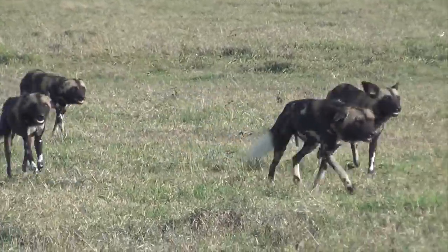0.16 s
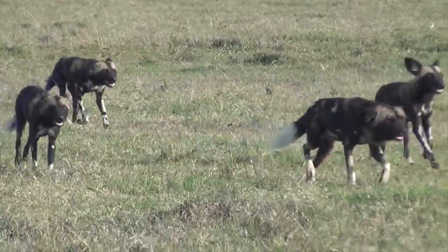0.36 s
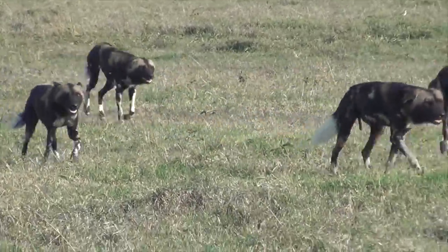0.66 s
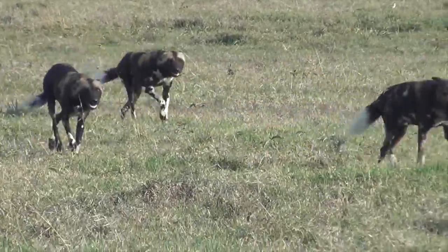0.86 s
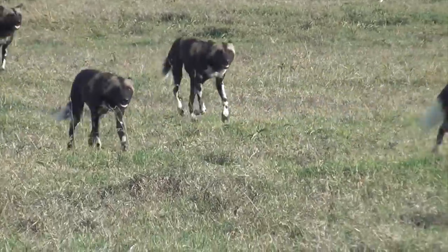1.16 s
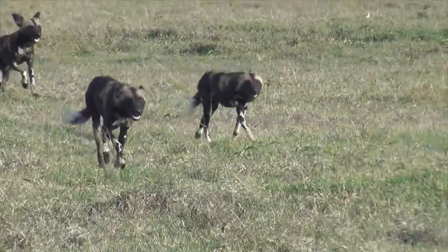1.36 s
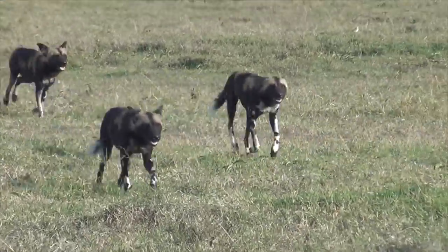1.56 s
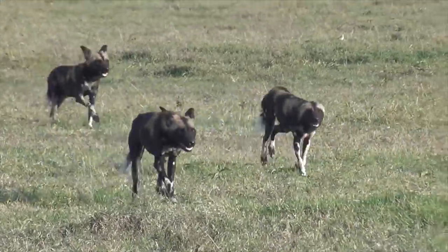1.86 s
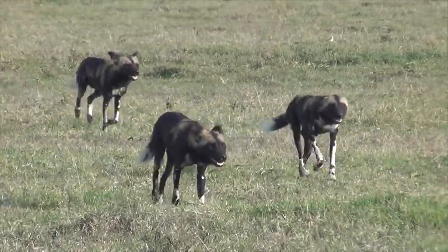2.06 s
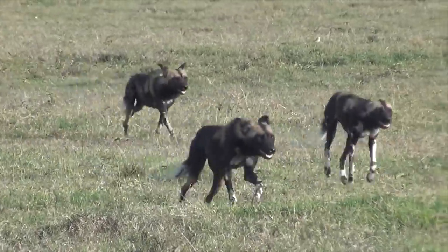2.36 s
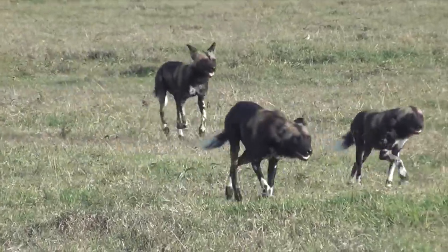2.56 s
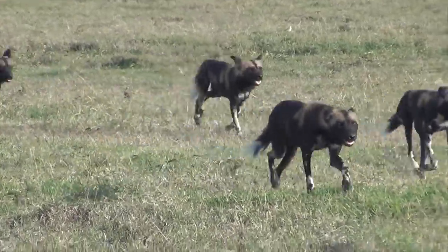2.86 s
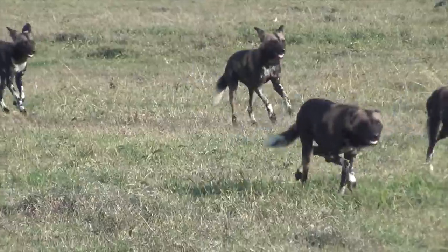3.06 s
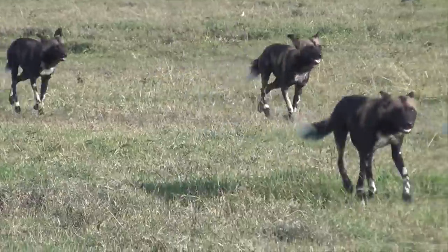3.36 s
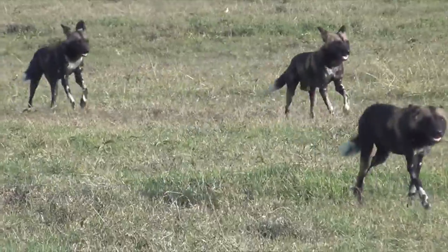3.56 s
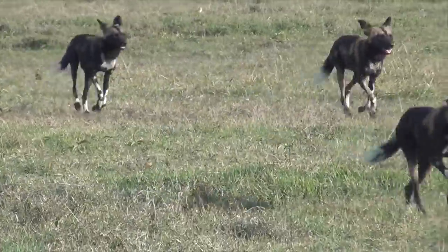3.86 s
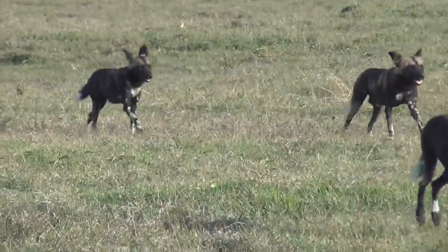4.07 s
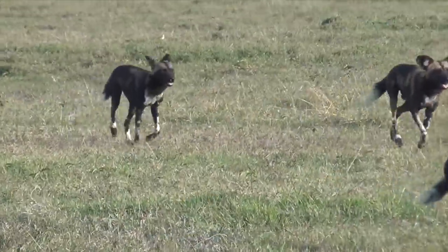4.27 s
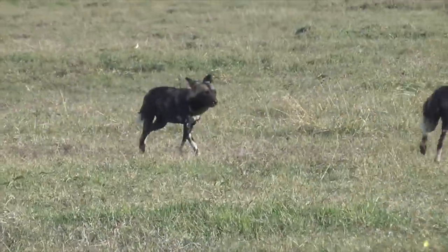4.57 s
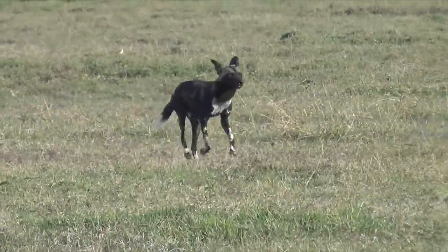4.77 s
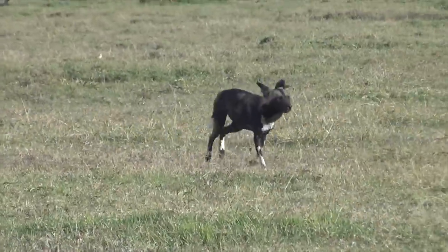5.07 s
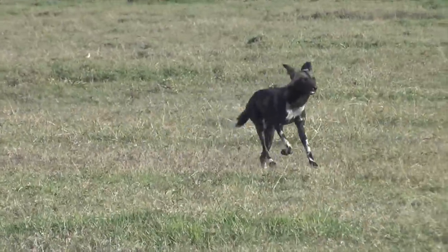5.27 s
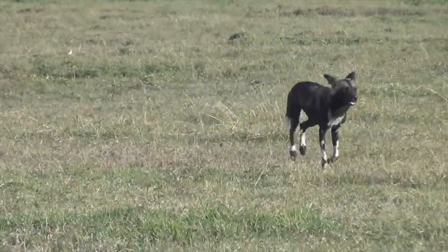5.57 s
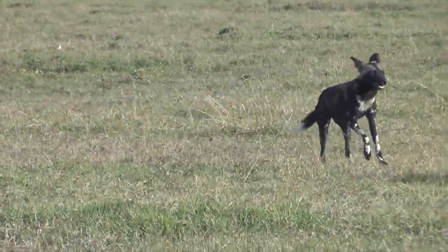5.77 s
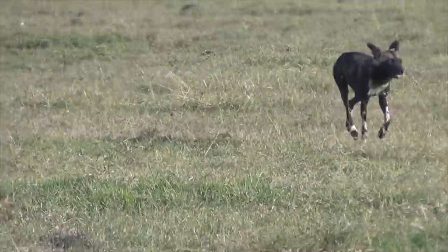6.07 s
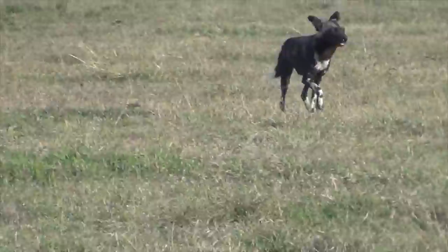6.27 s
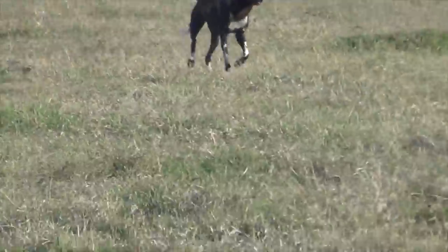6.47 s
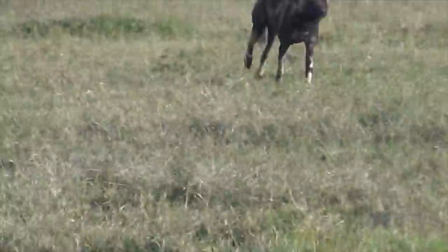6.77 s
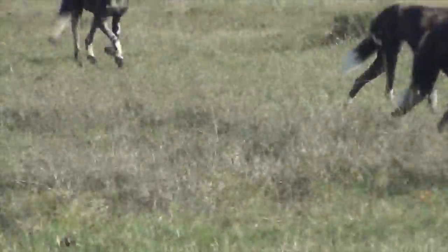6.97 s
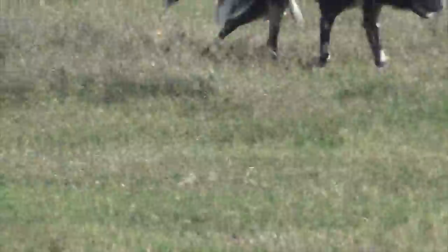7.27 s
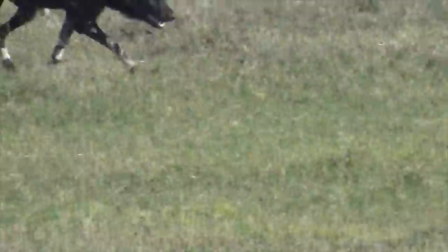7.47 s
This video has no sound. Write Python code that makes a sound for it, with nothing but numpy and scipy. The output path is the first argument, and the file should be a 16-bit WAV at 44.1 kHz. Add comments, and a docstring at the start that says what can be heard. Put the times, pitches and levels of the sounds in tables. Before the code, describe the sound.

A pack of wild dogs twitters in rapid, high, hoarse chirps that thin to single calls, over wind rumbling and thumping on the microphone.

```python
"""On open grassland a pack of wild dogs twitters, the overlapping calls thinning out to single ones.
Each call climbs in a low voice, cracks hoarsely into a higher one, crests and drops away.
Wind rumbles and thumps as swirls of air hit the microphone. Late on comes one faint click,
then a sharper tick close by. A soft hiss and a thin whine lie under it all."""
import sys
import numpy as np
from scipy import signal
from scipy.fft import rfft, irfft
from scipy.io import wavfile
from scipy.ndimage import uniform_filter1d

SR = 44100
rng = np.random.default_rng(int(sys.argv[2]) if len(sys.argv) > 2 else 0)


def master(y):
    """Save y as 16-bit WAV."""
    cut = np.clip(np.atleast_2d(y).T, -1, 1)
    pcm = np.round(cut * 32767)  # scale
    wavfile.write(sys.argv[1], SR, pcm.astype(np.int16))


N = 336483
TIME = np.arange(N) / SR

# Calls that crack from low to high. Each row: start in seconds, rise time in seconds, starting and
# crest pitch of the main overtone in Hz, lead-in level, crest level and brightness in dB, roughness 0-1.
TWITTERS = [(-.04, 0.066, 2744, 2903, -46, -31, -0.5, .15), (0, 0.069, 2250, 2710, -54, -38, -2, 0.37),
            (.135, 0.074, 2060, 2744, -57.5, -37.5, 1, 0.65),
            (.181, 0.065, 2490, 2680, -53, -36.5, -4, 0.16), (.199, 0.074, 2610, 2830, -60, -33.5, 3, .23),
            (.23, .14, 2380, 2580, -49.5, -38.5, -20, 0.25),
            (.548, 0.049, 2230, 2740, -45.5, -32.5, -1, 0.19), (.57, 0.076, 2206, 2740, -48, -50, -1, 0.19),
            (0.694, 0.079, 2230, 2895, -49.5, -41, 0, 0.3), (.7, .085, 2130, 2755, -58, -38.5, 3, 0.07),
            (.81, 0.12, 2216, 2870, -47.5, -41, -15, 0.22), (.82, .169, 1955, 2797, -51.5, -42.5, 9, 0.21),
            (.93, 0.068, 2436, 2820, -59, -37, -5, 0.22), (1.06, 0.15, 2255, 2710, -49, -39, 4, 0.57),
            (1.099, 0.14, 1940, 2950, -49, -39, -1.5, 0.1), (1.323, .106, 1920, 2750, -52, -32.5, -5, 0.5),
            (1.38, 0.1, 2280, 2810, -58, -33, -5.5, 0.3),
            (1.671, 0.12, 2000, 2840, -43.5, -32.5, -9.5, 0.12),
            (1.692, 0.12, 1850, 2890, -46.5, -48, -1, 0.37),
            (1.835, 0.068, 2084, 2677, -51, -35.5, -10, 0.12),
            (1.936, 0.12, 2150, 2830, -49, -37.5, -8, 0.37), (1.945, 0.2, 1960, 2697, -47.5, -39, -3, 0.3),
            (2.215, 0.17, 1890, 2850, -56, -36.5, -13, 0.06),
            (2.262, .14, 2223, 2716, -49, -50.5, 4.5, 0.42), (2.4, .068, 2500, 2750, -62, -50.5, 0, 0.13),
            (2.53, 0.16, 1900, 3090, -55, -39.5, -18, 0.6),
            (2.588, 0.087, 2300, 2595, -56, -43.5, 0.5, 0.62),
            (2.845, 0.12, 2113, 2937, -49.5, -48.5, -5, 0.4),
            (2.869, 0.073, 2330, 2680, -58, -41.5, -4, 0.34),
            (3.151, 0.12, 2105, 2830, -47.5, -46, -1.5, 0.48),
            (3.468, 0.13, 2060, 2836, -49, -42.5, -1.5, 0.36), (3.792, 0.11, 2080, 2814, -49, -45, 1.5, .2),
            (4.112, 0.11, 2097, 2770, -47.5, -45, -1, 0.17), (4.421, 0.11, 2087, 2797, -44, -45, 1, 0.37),
            (4.71, 0.13, 2013, 2884, -53, -44.5, -0.5, 0.3), (4.94, 0.16, 1894, 2564, -54, -36.5, -9, 0.55),
            (5.031, 0.089, 2210, 2740, -50.5, -35, -5.5, 0.38),
            (5.273, 0.11, 1920, 2820, -46, -35.5, 0, 0.28),
            (5.264, 0.17, 1883, 2975, -55, -47.5, -15, 0.76), (5.542, .097, 1946, 2740, -51, -43, -2, 0.16),
            (5.79, .102, 2036, 2920, -48, -42.5, 2, 0.32), (6.045, 0.1, 2080, 2800, -53, -46, 5.5, 0.2),
            (6.309, .098, 2100, 2850, -48, -47, -4, .25), (6.547, .102, 1984, 2860, -55, -47, 4.5, 0.22),
            (6.776, .103, 1970, 2930, -58, -46, 3.5, 0.32),
            (7.028, 0.1, 1957, 2895, -41.5, -39, -0.5, 0.29), (7.265, .092, 2060, 2995, -52, -43, -9, 0.31),
            (7.475, 0.09, 1887, 2950, -52, -46, 2.5, .4)]
# Calls that flutter in the high voice. Each row: the same as a twitter, without the roughness.
TRILLS = [(.32, .1, 2505, 2696, -54, -33, -5), (0.449, 0.081, 2660, 2840, -59.5, -38.5, 7),
          (1.58, 0.08, 2200, 2690, -54.5, -37.5, -5), (2.709, 0.14, 2470, 2860, -64, -45, -20),
          (2.999, 0.071, 2395, 2750, -60, -49.5, -2), (3.08, .13, 2430, 2716, -57, -42.5, -1),
          (3.298, 0.14, 2170, 2660, -58, -51, 0), (3.631, .14, 2507, 2814, -57, -41, -1.5),
          (3.954, .14, 2050, 2210, -60.5, -46, -5), (4.295, .155, 2140, 2346, -52, -38.5, -9),
          (5.599, 0.14, 2130, 2744, -55.5, -40.5, -6.5), (5.913, 0.14, 2170, 2686, -57.5, -40, -8),
          (6.202, 0.1, 1950, 2514, -57, -52, -10)]
def dog_pack(left_db=-1.4, spread_db=3, max_lag_s=.00004):
    """The dogs call from different directions, so left and right differ a little in time and level."""
    wobbles = voice_wobbles()
    calls = []
    for start, rise_s, *settings in TWITTERS:
        crack_s = max(rise_s - .053, .0178)  # shortly before the crest, never right at the start
        call = dog_call(wobbles, rise_s, *settings, crack_s=crack_s, climb=.57, flutter=.12)
        calls.append((start, call))
    for start, *settings in TRILLS:
        call = dog_call(wobbles, *settings, rough=.34, crack_s=.0162, climb=.166, flutter=.617)
        calls.append((start, call))
    out = np.zeros((2, N))
    for (start, call), direction in zip(calls, rng.uniform(-1, 1, len(calls))):
        t = np.arange(len(call)) / SR
        pan_db = left_db + spread_db * direction
        lag = max_lag_s * direction / 2
        left = gain_of(pan_db) * np.interp(t - lag, t, call)
        right = gain_of(-pan_db) * np.interp(t + lag, t, call)
        add(out, start, np.array([left, right]))
    return out


def dog_call(wobbles, rise_s, start_hz, crest_hz, lead_db, crest_db, bright_db, rough,
             crack_s, climb, flutter, fall_s=.02367, flutter_hz=88):
    """One call: the voice glides up, turns hoarse as it cracks from low to high, then drops away."""
    end_s = rise_s + fall_s
    t = np.arange(0, end_s, 1 / SR)
    drift, shake, shimmer, rasp = np.roll(wobbles, -rng.integers(N), 1)[:, :len(t)]
    falling = np.clip((t - rise_s) / fall_s, 0, 1)
    push = np.exp(-(np.minimum(t - rise_s, 0) / .02336) ** 2)  # the last effort: higher, louder, steadier
    cracking = np.exp(-((t - crack_s - .008) / .02) ** 2) * np.clip(t / .036, 0, 1)
    hoarse = np.clip(rough + .25 * flutter, 0, 1) * (1 - .7 * falling)
    hoarse *= .45 + 1.15 * cracking + .3 * (t > crack_s)
    # An uneven trill shakes both loudness and pitch.
    trill_depth = np.clip(flutter + .5 * rough, 0, 1) * (1 - .8 * push) * np.clip(t / .03, 0, 1)
    trill_phase = 2 * np.pi * np.cumsum(flutter_hz * (1 + .42 * drift)) / SR

    crack_hz = start_hz + climb * (crest_hz - start_hz)  # climb is the share of the rise made by then
    hz = np.interp(t, [0, crack_s, rise_s], [start_hz, crack_hz, crest_hz * (1 - .0344)])
    hz *= 1 + .0344 * push
    hz *= 1 - .215 * (1 + .28 * drift[-1]) * falling ** 2.12  # each call drops by its own amount
    waver = (.012 + .025 * trill_depth ** 2) * drift[::-1] + .0632 * hoarse * shake
    waver += .082 * trill_depth ** 2 * np.cos(trill_phase + 1.2)
    cycles = np.cumsum(hz * (1 + waver)) / SR

    # The main overtone glides on while the note beneath it leaps up by a fifth.
    treble_db = bright_db * (.5 + .5 * push) - 4 * (1 - push) * (1 + trill_depth ** 2)
    low = throat_tone(hz, cycles, harmonic=3, bass_db=2.5, treble_db=treble_db - 7.5)
    high = throat_tone(hz, cycles, harmonic=2, bass_db=0, treble_db=treble_db - .9)
    high_share = .5 + .5 * np.tanh((t - crack_s) / .0023)
    voice = np.sqrt(1 - high_share) * low + np.sqrt(high_share) * high
    voice = voice * (1 + hoarse * shimmer) + .83 * hoarse * rasp * (1 - .5 * push)

    effort_db = np.interp(t, [0, crack_s, rise_s, end_s],
                          [lead_db - 1, lead_db, crest_db - 1.5, crest_db - 7.5])
    effort_db += push - 16 * flutter * falling  # fluttering calls die away faster
    fades = np.clip(t / .0053, 0, 1) * np.clip((end_s - t) / .0045, 0, 1)
    return voice * (1 + .64 * trill_depth * np.cos(trill_phase)) * fades * gain_of(effort_db)


# How a dog's throat and mouth colour its voice. Each row: frequency in Hz, boost or cut in dB.
THROAT = [(700, -12), (1350, -11.5), (1700, 3), (2150, 7.5), (2700, 1.5), (3300, 4.5), (4150, -6.5),
          (4700, -0.5), (5500, -13.5), (6200, -22), (7100, -12), (8500, -27.5), (11000, -61)]
def throat_tone(hz, cycles, harmonic, bass_db, treble_db):
    """A stack of overtones shaped by the throat; the main one, at hz, is number `harmonic`."""
    ratio = np.arange(1, 4 * harmonic + 1)[:, None] / harmonic
    db = curve_at(THROAT, ratio * hz) - curve_at(THROAT, hz)
    db += bass_db * (ratio < 1) + treble_db * (ratio > np.sqrt(2))
    db -= 5 * ((ratio > 1) & (ratio < np.sqrt(2)))  # softens the low voice's fourth harmonic
    return np.sqrt(2) * (gain_of(db) * np.cos(2 * np.pi * ratio * cycles)).sum(0)


# The hoarse noise in the voice. Each row: frequency in Hz, relative level in dB.
RASP = [(600, -35), (1300, -60), (1800, 19.5), (2500, 29), (3300, 18), (4100, -22), (4700, 12),
        (5400, -3.5), (6200, -50), (10000, -45)]
def voice_wobbles():
    """What makes a voice unsteady: random drift, faster shake and shimmer, and a noisy rasp."""
    return np.array([wander(80), wander(330), wander(600), noise(RASP, HISS_LIKENESS).mean(0)])


def grassland_echo(sound, die_away_s=.23, echo_db=-17):
    """The ground and tufts of grass scatter the calls into a short, faint tail."""
    t = np.arange(SR // 2) / SR
    tail = rng.standard_normal((2, len(t))) * gain_of(-60 * t / die_away_s) * (t > .002)
    tail /= np.linalg.norm(tail[0])
    return sound + gain_of(echo_db) * signal.fftconvolve(sound, tail, axes=1)[:, :N]


# The breeze between gusts. Each row: time in seconds, rumble strength in dB, swirl strength in dB.
BREEZE = [(0, -32, -30.5), (.28, -34.5, -31.5), (.43, -42.5, -41.5), (.6, -31, -30), (1.75, -44, -28),
          (2.0, -36.5, -29.5), (2.85, -33.5, -31), (3.75, -33, -31), (3.951, -35.5, -40), (4.33, -36, -40),
          (4.46, -33, -32), (5.2, -32, -35.5), (6.0, -30.5, -45.5), (6.12, -40, -57), (6.28, -32, -41.5),
          (6.8, -31, -38), (7.6, -23.5, -34.5)]
# Gusts. Each row: start in seconds, length in seconds, rumble strength in dB, swirl strength in dB.
GUSTS = [(0.166, 0.11, -32, -26), (0.666, 0.16, -26, -23), (0.864, 0.25, -32, -25),
         (1.179, 0.062, -22.5, -28.5), (1.348, 0.13, -34, -24.5), (1.469, 0.22, -25.5, -22),
         (2.26, 0.13, -36, -26), (2.448, 0.21, -22, -22.5), (3.07, 0.26, -29, -26),
         (3.377, 0.29, -32.5, -33), (3.698, 0.041, -24, -29), (4.569, 0.04, -27, -25),
         (4.952, 0.083, -26, -34.5), (5.271, 0.13, -27, -35), (5.614, 0.237, -26.5, -32),
         (5.902, .14, -25.5, -29.5), (6.186, 0.024, -19, -32), (6.391, 0.049, -27, -29.5),
         (6.913, 0.12, -28, -37), (7.066, 0.03, -16.5, -31), (7.155, 0.146, -28, -36),
         (7.329, 0.081, -21, -29), (7.522, 0.11, -18, -22.5)]
def wind_strength(rise_s=.0093, drop_s=.01):
    """Gusts rise, hold and drop on top of the breeze. Gives two curves in dB: rumble and swirls."""
    times, *levels = np.transpose(BREEZE)
    power = gain_of([np.interp(TIME, times, db) for db in levels]) ** 2
    for start, length, *gust_db in GUSTS:
        ramps = np.minimum((TIME - start) / rise_s, (start + length - TIME) / drop_s)
        power += np.outer(gain_of(gust_db), np.clip(.5 + ramps, 0, 1)) ** 2
    return 10 * np.log10(power)


# The tone of deep rumble, small swirls and hard blowing. Each row: frequency in Hz, relative level in dB.
RUMBLE = [(10, -13), (25, -10), (55, -4), (90, -2.5), (125, -6.5), (180, -13), (300, -29), (600, -101.5)]
SWIRLS = [(40, -19), (100, 4.5), (150, 1.5), (210, -2.5), (320, -14), (450, -23.5), (700, -31),
          (1200, -34.5), (3000, -88)]
BLOWING = [(30, -0.5), (120, 8), (280, 6.5), (420, -2), (650, -16.5), (1000, -35.5), (1500, -42.5),
           (2200, -48), (5000, -75)]
# How alike the wind is left and right. Each row: frequency in Hz, likeness from -1 (opposite) to 1 (same).
WIND_LIKENESS = [(30, 0.62), (90, 0.99), (180, 0.58), (350, 0.08), (700, -0.37), (1500, 0.45)]
def wind(rumble_db, swirl_db):
    """Churning air at the microphone: deep rumble, small swirls and a tearing that grows fast in gusts."""
    lumps_db = 2 * wander(40.4)
    rumble = steadied(noise(RUMBLE, WIND_LIKENESS), span_s=.0894)
    rumble *= gain_of(rumble_db + .5 + 2.1 * wander(22.4))
    swirls = steadied(noise(SWIRLS, WIND_LIKENESS), span_s=.0395)
    swirls *= gain_of(swirl_db - 3.5 + lumps_db)
    tearing_db = -31.5 + 1.78 * (swirl_db + 25) + 2 * lumps_db
    return rumble + swirls + noise(BLOWING, WIND_LIKENESS) * gain_of(tearing_db)


# The hardest hits of wind. Each row: start in seconds, strength in dB, strength of its bright edge in dB.
THUMPS = [(0.144, -22.5, -50), (.213, -17, -30), (0.224, -12, -46), (.657, -16, -29), (.698, -16.5, -25.5),
          (0.785, -16.5, -45), (0.959, -11, -21), (1.015, -12.5, -45), (1.349, -22, -42),
          (1.391, -10.5, -27), (1.485, -9.5, -26.5), (1.499, -17, -19.5), (1.541, -21, -44),
          (1.566, -26, -25), (2.226, -22.5, -45), (2.283, -13, -21), (2.44, -13, -25.5),
          (2.477, -11.5, -19), (2.614, -16, -27.5), (3.472, -23, -60), (3.525, -17.5, -62),
          (3.568, -17, -58), (4.595, -15, -31), (4.607, -19, -49), (7.077, -20.5, -44), (7.594, -9, -27)]
def wind_thumps(swirl_db, rise_s=.0034, edge_hz=520):
    """A hard swirl of air shoves the microphone's thin membrane for a few milliseconds."""
    body = steadied(noise(BLOWING, WIND_LIKENESS), span_s=.0079)
    cut_bass = signal.butter(3, edge_hz, "high", fs=SR, output="sos")
    edge = steadied(unit_level(signal.sosfilt(cut_bass, body)), span_s=.0054)
    body_gain, edge_gain = np.zeros((2, N))
    for start, body_db, edge_db in THUMPS + small_thumps(swirl_db):
        near = slice(max(int((start - .01) * SR), 0), int((start + .06) * SR))
        age = np.maximum(TIME[near] - start, 0) / rise_s
        shove = age * np.exp(1 - age)
        body_gain[near] += shove * gain_of(body_db + .5)
        edge_gain[near] += shove * gain_of(edge_db + 2)
    return body * body_gain + edge * edge_gain


def small_thumps(swirl_db, count=48, scatter_db=5):
    """Lesser swirls strike at uneven times, harder in stronger wind. Gives rows like those of THUMPS."""
    offset, size = rng.random((count, 2)).T
    starts = (np.arange(count) + offset) / count * N / SR
    body_db = np.interp(starts, TIME, swirl_db) + 1 + scatter_db * (2 * size - 1)
    return list(zip(starts, body_db, body_db - 20))


# The tick's ringing tones. Each row: frequency in Hz, width in Hz (wider dies sooner), level in dB.
TICK_TONES = [(1260, 320, -9.5), (3390, 110, -11.5), (3870, 200, -11), (4350, 270, -13), (5040, 120, -17),
              (8000, 340, -9), (9900, 1250, 7.5), (10900, 1100, 5.5), (13100, 510, -8)]
def near_tick(start_s=6.716, gain_db=-11, rise_s=.0001, tail_s=.031):
    """A small hard knock beside the microphone: a bright snap and a brief rattling tail."""
    t = np.arange(SR // 12) / SR
    snap = sum(gain_of(db) * ringing(t, hz, width_hz) for hz, width_hz, db in TICK_TONES)
    snap *= 1 - np.exp(-t / rise_s)
    shared, apart = rng.standard_normal((2, len(t)))
    rattle = gain_of(-23 - 60 * t / tail_s) * np.array([shared + apart / 2, shared - apart / 2]) / 3
    rattle[:, 0] = 1  # the snap itself comes first
    lean_left = gain_of([[1.2], [-1.2]])
    out = np.zeros((2, N))
    add(out, start_s, gain_of(gain_db) * lean_left * signal.fftconvolve(rattle, snap[None], axes=1))
    return out


def faint_click(start_s=4.727, gain_db=-40, decay_s=.003):
    """A tiny dry click, high and thin, in the middle."""
    t = np.arange(SR // 30) / SR
    fizz = signal.fftconvolve(rng.standard_normal(len(t)), ringing(t, hz=7000, width_hz=1000))
    click = unit_level(fizz[:len(t)]) * np.exp(-t / decay_s)
    out = np.zeros((2, N))
    add(out, start_s, gain_of(gain_db) * np.array([click, click]))
    return out


# The tone of the hiss. Each row: frequency in Hz, relative level in dB.
HISS = [(290, -4), (500, -5.5), (630, -7.5), (891, -5.5), (1030, -11), (1320, -11.5), (1440, -8),
        (2150, -13.5), (3000, -19), (3470, -16.5), (4370, -17), (5830, -20.5), (15800, -22)]
# How alike the hiss is left and right. Each row: frequency in Hz, likeness (1 is the same).
HISS_LIKENESS = [(500, 0.5), (1500, 0.51), (4000, 0.62), (10000, 0.89)]
def hiss_and_whine(hiss_db=-52.5, whine_db=-72, whine_hz=15734):
    """The even hiss of distant grass and the microphone, with a thin electronic whine."""
    hiss = gain_of(hiss_db + .3 * wander(5.1)) * noise(HISS, HISS_LIKENESS)
    whine = gain_of(whine_db) * np.sqrt(2) * np.sin(2 * np.pi * whine_hz * TIME)
    return hiss + whine


def gain_of(db):
    """Turns decibels into a number to multiply a sound by."""
    return 10 ** (np.asarray(db) / 20)


def unit_level(sound):
    """Scales a sound to an average power of 1."""
    return sound / np.sqrt(np.mean(sound ** 2) + 1e-20)


def curve_at(table, hz):
    """Reads between the rows of a frequency table, giving each octave equal room."""
    row_hz, values = np.transpose(table)
    return np.interp(np.log(hz + 1), np.log(row_hz + 1), values)


def add(mix, start_s, sound):
    """Adds a stereo sound to the mix, dropping whatever sticks out at either end."""
    at = round(start_s * SR)
    sound = sound[:, max(-at, 0):]
    part = mix[:, max(at, 0):][:, :sound.shape[1]]
    part += sound[:, :part.shape[1]]


def ringing(t, hz, width_hz):
    """One struck tone dying away."""
    return np.exp(-np.pi * width_hz * t) * np.sin(2 * np.pi * hz * t)


def wander(rate_hz):
    """A smooth random curve that moves no faster than about rate_hz."""
    hz = np.fft.rfftfreq(N, 1 / SR)
    return unit_level(irfft(rfft(rng.standard_normal(N)) / (1 + (hz / rate_hz) ** 4), N))


def noise(tone, likeness):
    """Stereo noise with a given tone and a given likeness between left and right."""
    hz = np.fft.rfftfreq(N, 1 / SR)
    alike = np.clip(curve_at(likeness, hz), -.99, .99)
    shared, apart = rfft(rng.standard_normal((2, N))) * gain_of(curve_at(tone, hz))
    shared = irfft(shared, N)
    apart = irfft(apart * np.sqrt((1 - alike) / (1 + alike)), N)
    return np.array([shared + apart, shared - apart]) / shared.std()


def steadied(sound, span_s):
    """Takes the slow swells out of a noise, leaving its quick lumps."""
    power = uniform_filter1d(sound.mean(0) ** 2, int(span_s * SR))
    return sound / np.sqrt(power + 1e-3)


def scene():
    """The dogs on the plain, with wind, two small ticks and hiss."""
    rumble_db, swirl_db = wind_strength()
    dogs = grassland_echo(dog_pack())
    air = wind(rumble_db, swirl_db) + wind_thumps(swirl_db)
    return dogs + air + near_tick() + faint_click() + hiss_and_whine()


def record(dry, limit_db=-17, squeeze=.32, recover_db_per_s=70, top_hz=15950):
    """A limiter turns everything down briefly after the hardest thumps; the highest treble is cut off."""
    power_db = 10 * np.log10(abs(uniform_filter1d((dry ** 2).mean(0), size=200)) + 1e-12)
    recovery_db = TIME * recover_db_per_s
    held_db = np.maximum.accumulate(power_db + recovery_db) - recovery_db  # jumps up, sinks slowly
    over_db = np.maximum(held_db - limit_db, 0)
    limited = dry / gain_of(squeeze * uniform_filter1d(over_db, size=100))
    cut_treble = signal.firwin(511, top_hz, window=("kaiser", 9), fs=SR)
    return signal.oaconvolve(limited, cut_treble[None], "same")


dry = scene()
out = record(dry)
master(out)
```